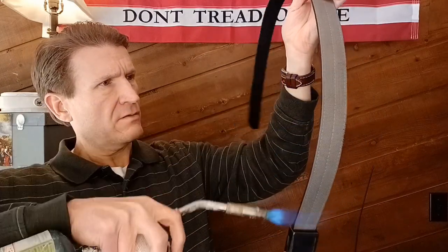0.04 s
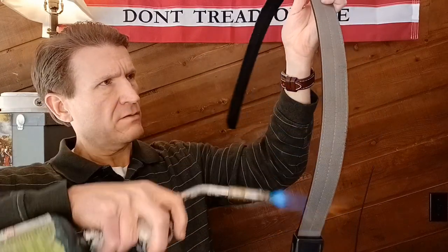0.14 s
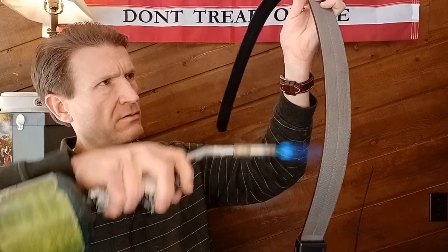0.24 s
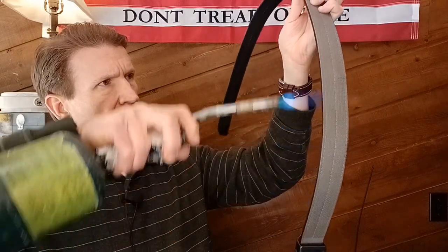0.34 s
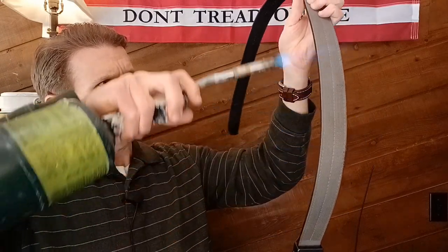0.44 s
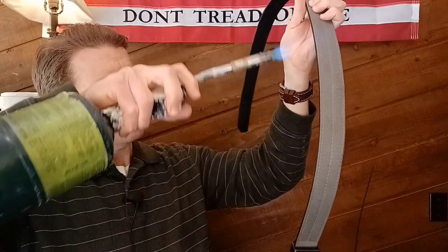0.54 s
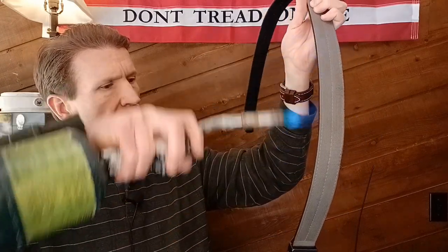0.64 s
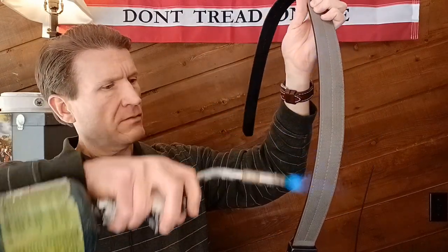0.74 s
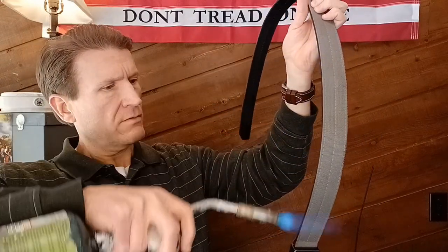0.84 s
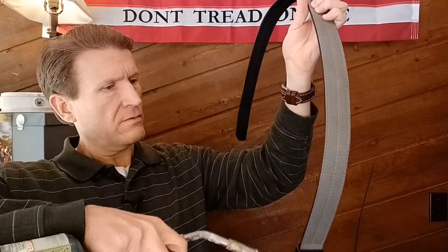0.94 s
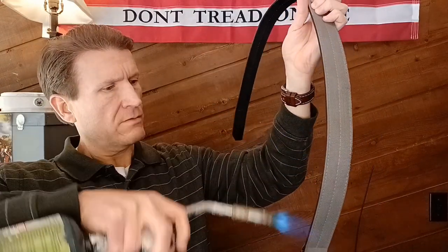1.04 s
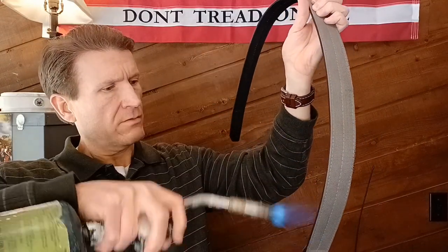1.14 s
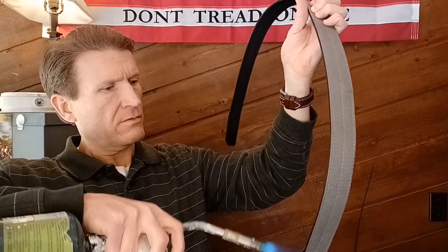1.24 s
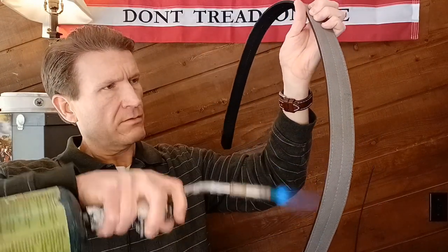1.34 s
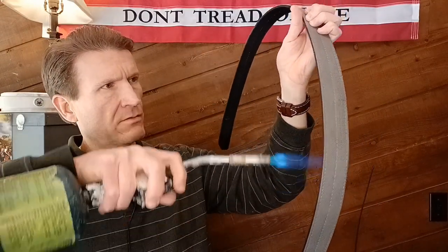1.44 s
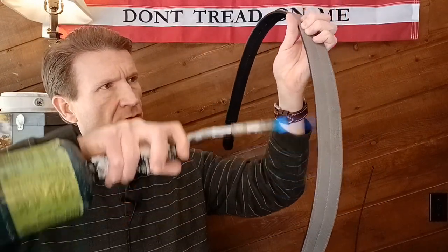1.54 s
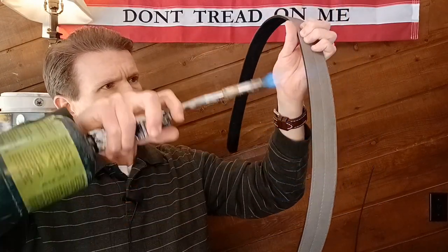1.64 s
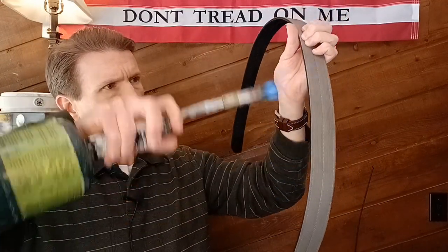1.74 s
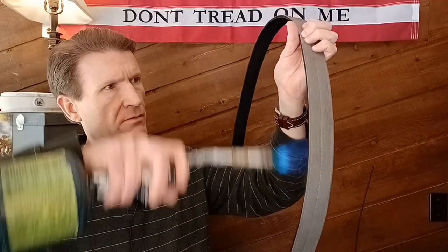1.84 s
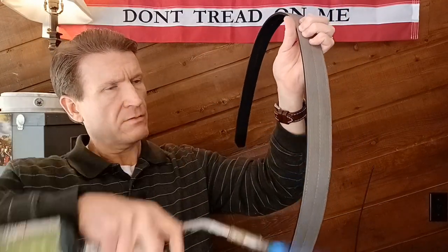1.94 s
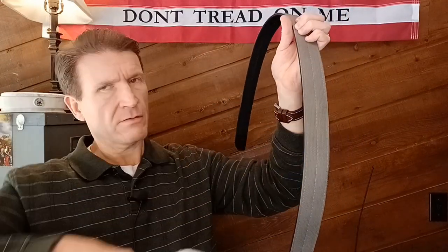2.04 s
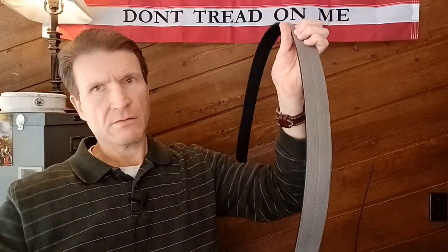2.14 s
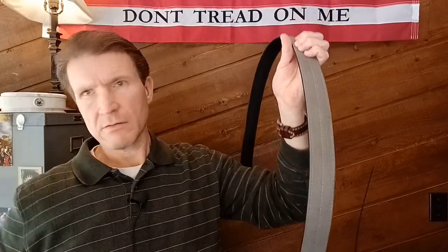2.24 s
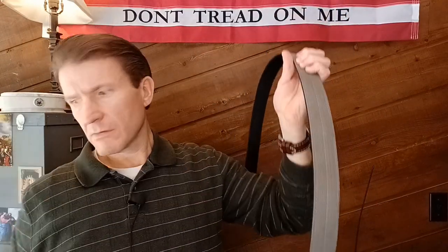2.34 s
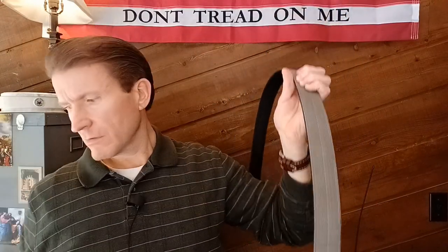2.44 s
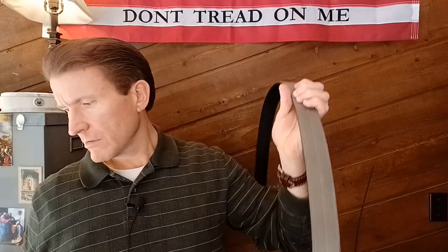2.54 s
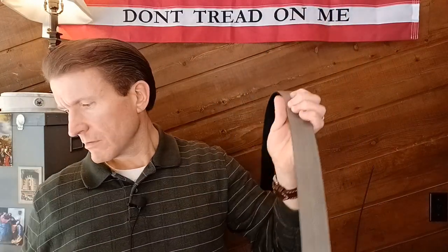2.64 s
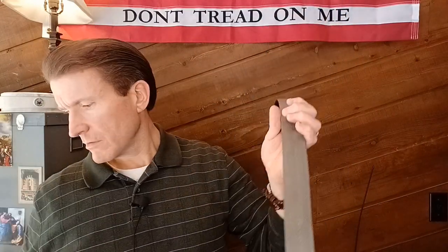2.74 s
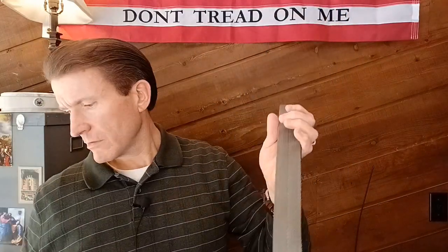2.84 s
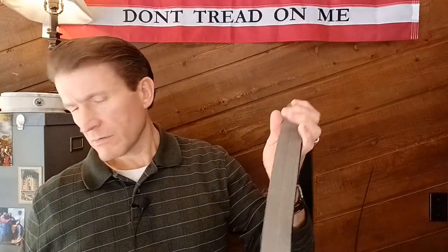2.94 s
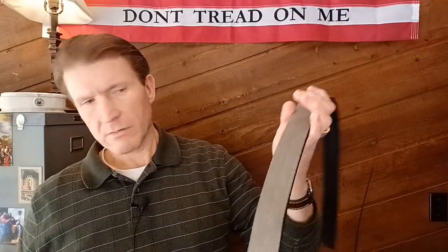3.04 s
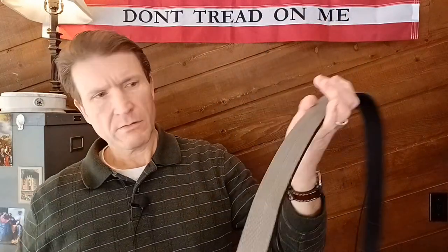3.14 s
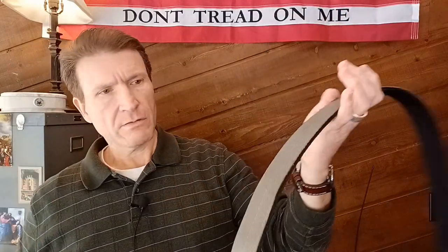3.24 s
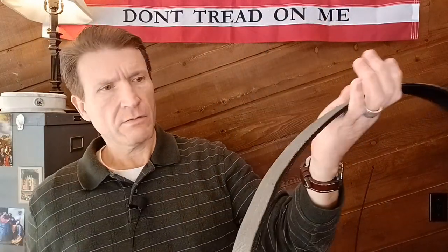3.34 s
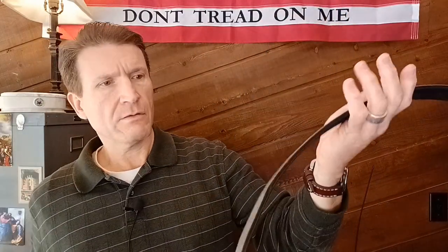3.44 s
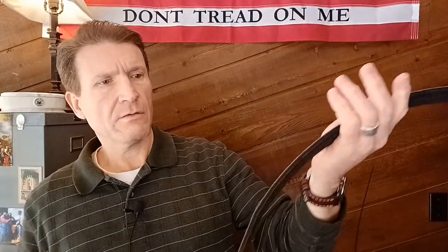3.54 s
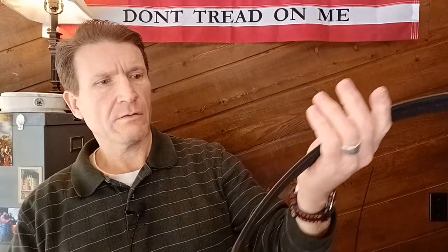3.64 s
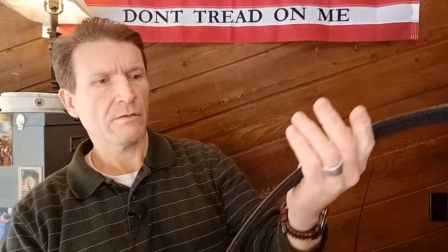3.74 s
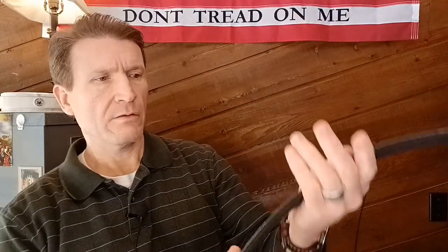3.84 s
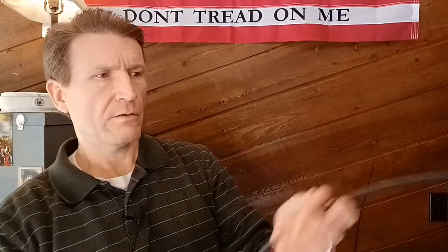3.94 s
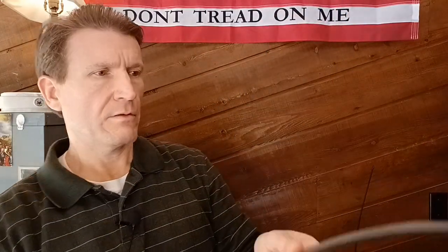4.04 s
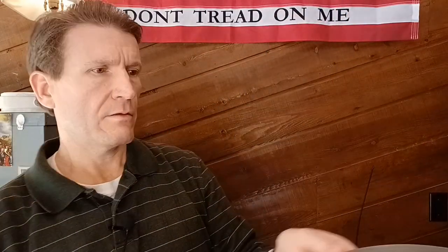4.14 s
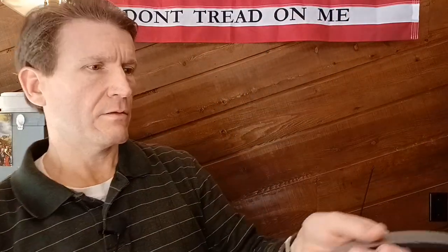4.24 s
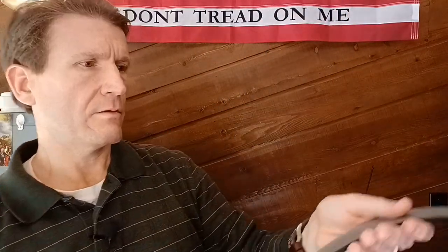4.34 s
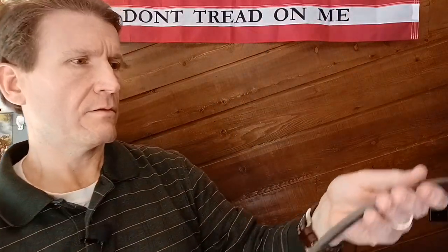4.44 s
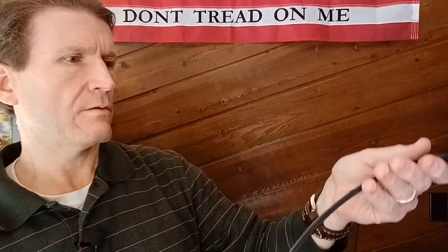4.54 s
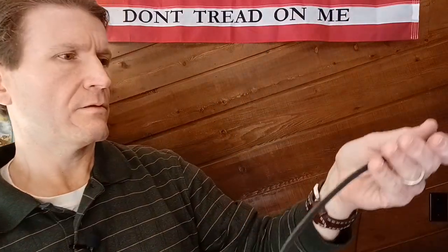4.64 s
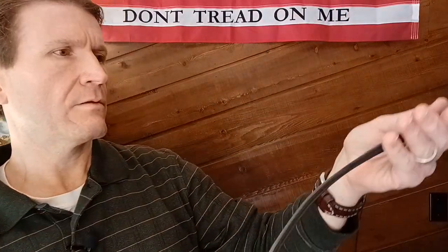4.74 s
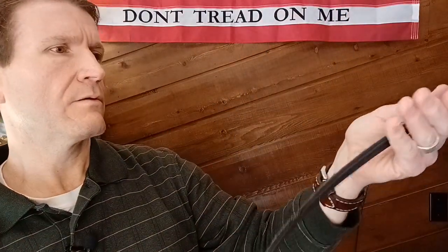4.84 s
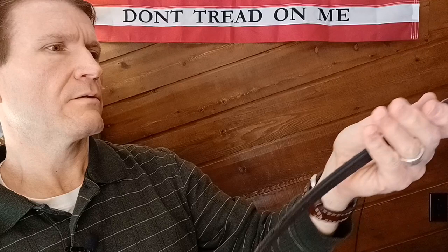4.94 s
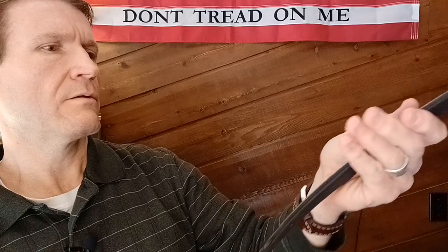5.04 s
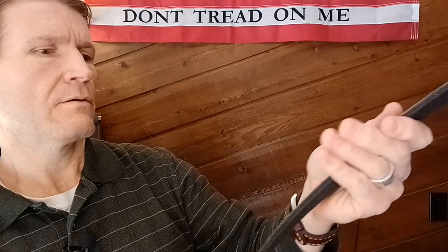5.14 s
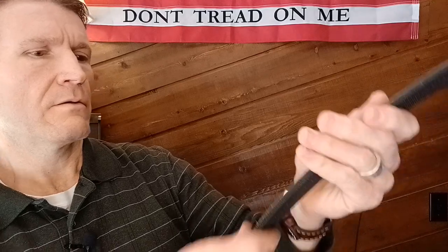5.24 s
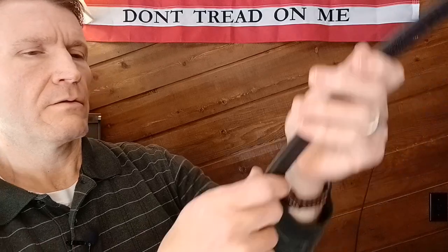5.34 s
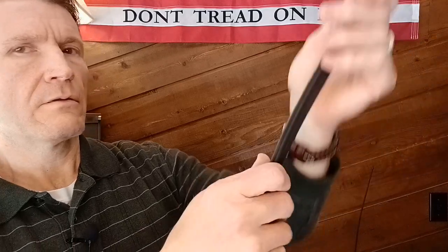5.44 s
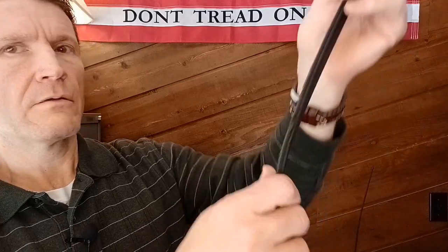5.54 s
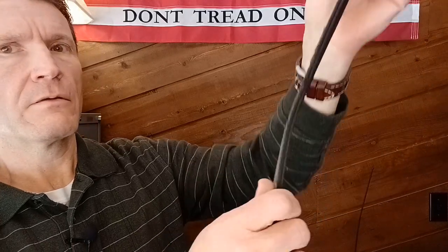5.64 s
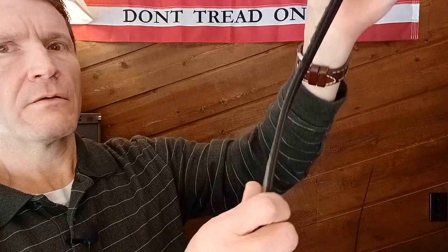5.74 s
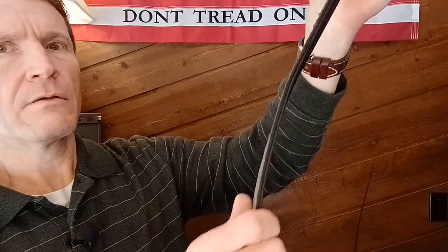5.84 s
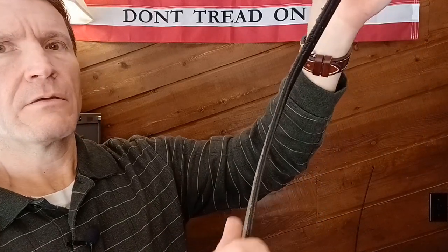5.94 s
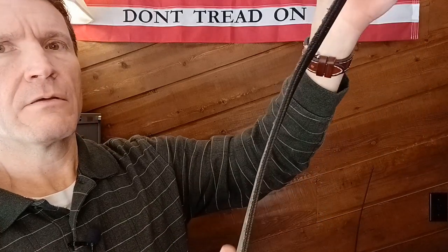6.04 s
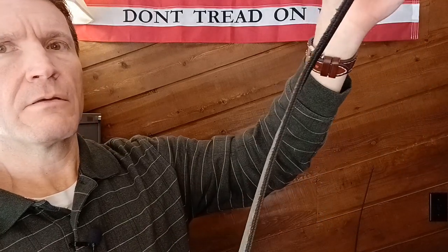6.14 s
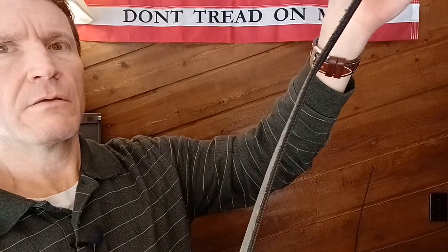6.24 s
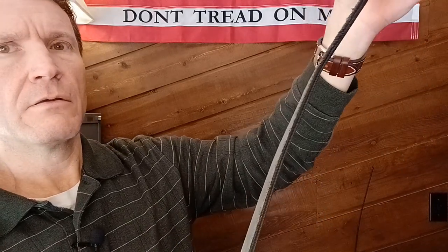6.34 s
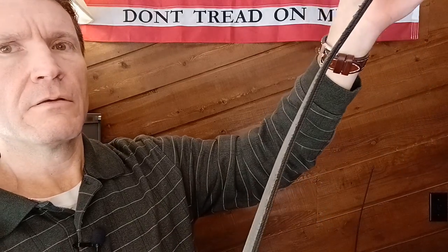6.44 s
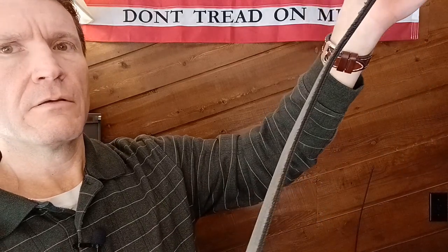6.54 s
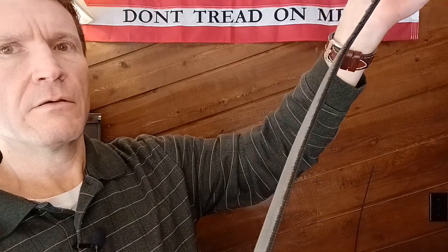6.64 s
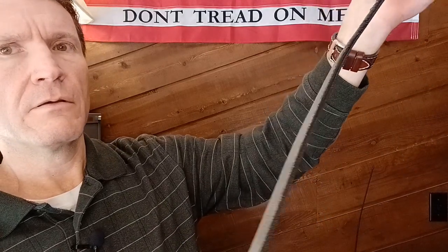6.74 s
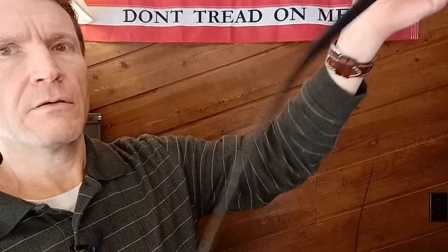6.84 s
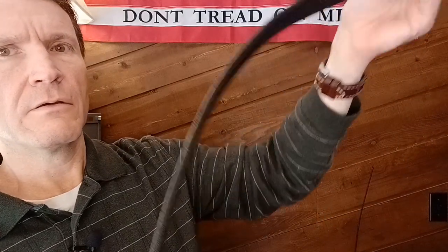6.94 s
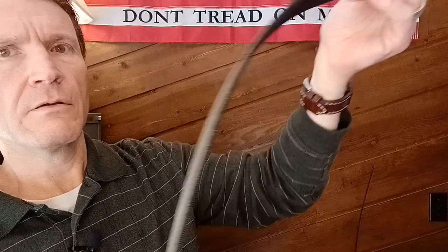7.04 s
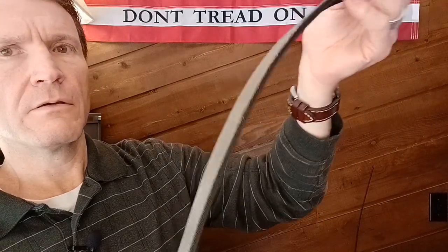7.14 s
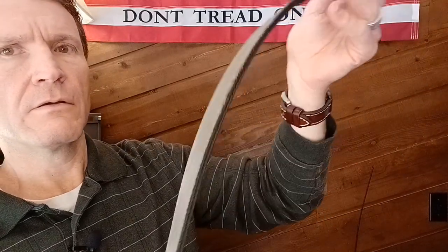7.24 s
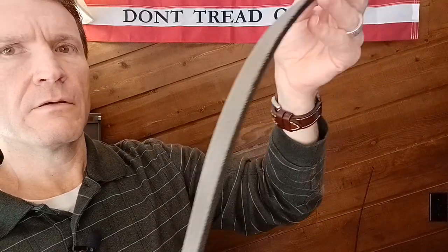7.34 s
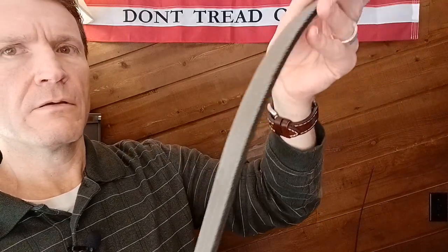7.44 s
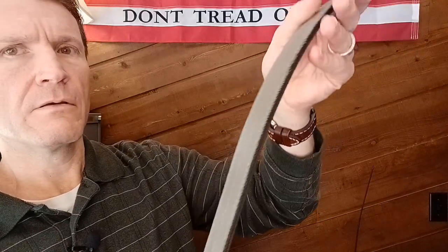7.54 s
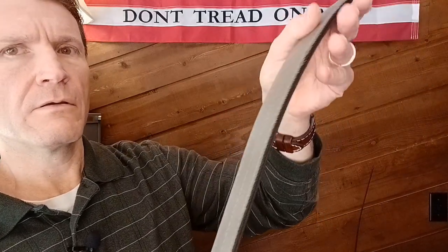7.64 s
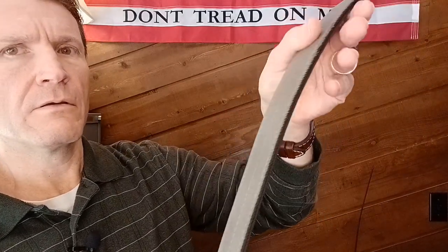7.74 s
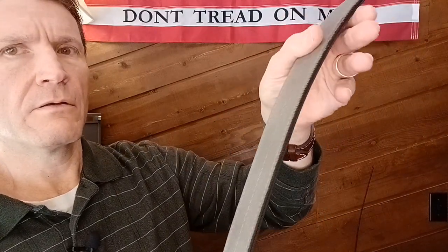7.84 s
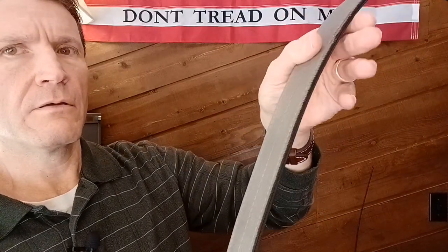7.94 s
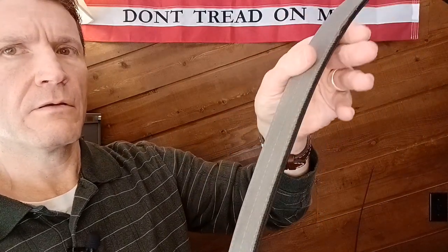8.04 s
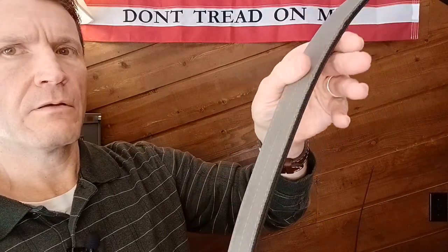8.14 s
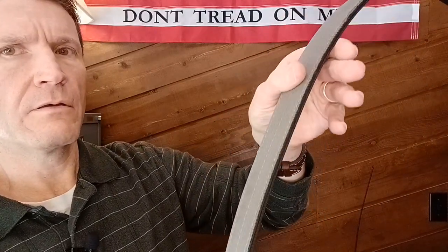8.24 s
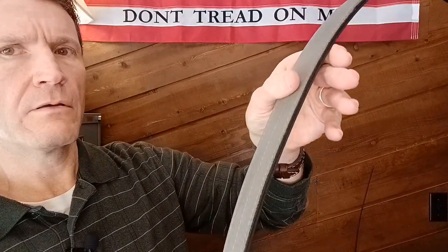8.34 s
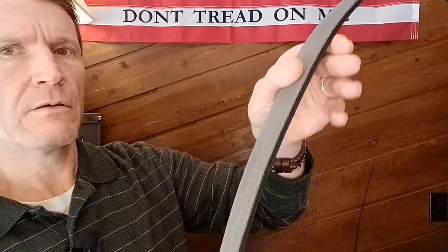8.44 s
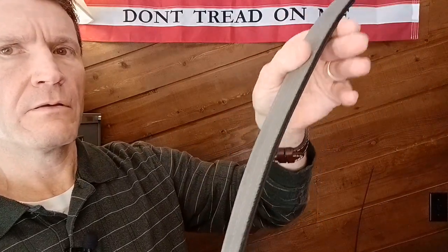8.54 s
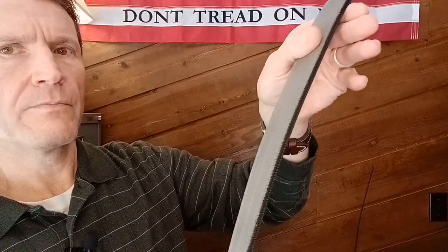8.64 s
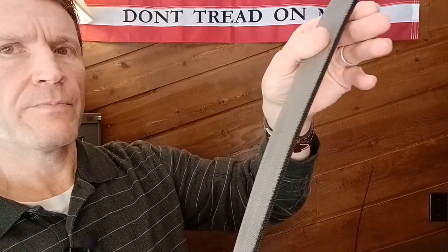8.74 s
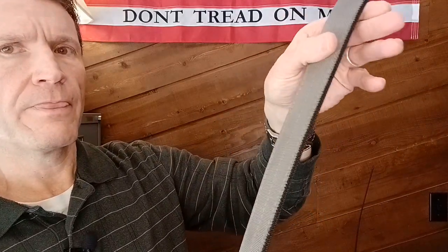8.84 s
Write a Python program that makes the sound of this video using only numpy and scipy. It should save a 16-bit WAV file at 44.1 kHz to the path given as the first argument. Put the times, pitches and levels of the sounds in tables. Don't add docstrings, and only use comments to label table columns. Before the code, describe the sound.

A handheld gas torch roars and hisses for two seconds, shuts off, thuds onto wood, then a woven strap rasps repeatedly through a hand.

```python
import sys
import numpy as np
from scipy import signal
from scipy.fft import rfft, irfft
from scipy.io import wavfile
from scipy.ndimage import uniform_filter1d, map_coordinates

SR = 44100
rng = np.random.default_rng(int(sys.argv[2]) if len(sys.argv) > 2 else 0)


def makeup_ratio(level_db):
    decades = np.asarray(level_db, float) / 20
    return 10 ** decades


def inscribe(sig):
    pcm = np.round(np.clip(np.atleast_2d(sig).T, -1, 1) * 32767)
    wavfile.write(sys.argv[1], SR, pcm.astype(np.int16))


N = 391600

# frequency in Hz, density in dB per Hz.
FIRE_SPECTRUM = [(24, -77.5), (40, -55), (114, -11.5), (154, -16.5), (254, -9.5), (600, -7.5), (1170, -8),
                 (2000, -13.5), (2300, -17.5), (2530, -23.5), (2830, -20.5), (3370, -30), (3760, -36),
                 (4300, -30.5), (5400, -30.5), (5780, -36), (6150, -31), (9770, -32.5), (15700, -43.5)]
# time in seconds, pitch in Hz, boost in dB.
TUBE_NOTE = [(.05, 620, 10.5), (.17, 595, 12), (.25, 560, 16), (.33, 584, 12), (.44, 660, 12),
             (.51, 560, 14.5), (.6, 595, 12), (.66, 694, 12), (.75, 640, 8), (.83, 600, 8), (.9, 718, 9.5),
             (1.0, 690, 10.5), (1.08, 657, 11.5), (1.13, 550, 14), (1.22, 600, 10.5), (1.32, 596, 8),
             (1.42, 557, 15), (1.5, 590, 11.5), (1.6, 630, 9), (1.65, 535, 11), (1.74, 647, 10.5),
             (1.85, 564, 7.5), (2.0, 580, 9)]
# time in seconds, height 0-1.
TORCH_HEIGHT = [(0, .55), (.16, 0), (.4, .6), (.57, .9), (.75, .6), (1.04, 0), (1.2, .2), (1.35, 0),
                (1.55, .65), (1.76, 1), (1.9, .6), (2.0, .15), (2.2, 0)]
# centre in Hz, width in Hz, level in dB at rest, level in dB at full height.
NOZZLE_MODES = [(1700, 700, -1.5, -25.5), (2200, 350, -7, -4.5), (3350, 490, -2.5, 2),
                (5180, 240, -8, -0.5)]
# delay in ms, strength 0-1.
NEARBY_SURFACES = [(.95, .06), (.52, .08)]
ROAR_DB, MID_DB, HISS_DB = -22, -26, -32.5
RAISED_ROAR_DB, RAISED_MID_DB, RAISED_HISS_DB = -1, -6.5, -1
SHUT_S, HISS_LINGERS_S = 2.0313, 0.026
ROAR_FALL_DB_PER_S, MID_FALL_DB_PER_S, HISS_FALL_DB_PER_S = 670, 890, 900
TUBE_WANDER_HZ = 8.3
JET_HZ, JET_RISE_HZ, JET_DB = 9500, 900, -0.5
SHADOW_HZ, SHADOW_RISE_HZ, SHADOW_DEPTH = 6150, 2900, 0.5
BOUNCE_LOW_MS, BOUNCE_HIGH_MS, BOUNCE_STRENGTH = 0.735, 0.61, 0.2

# frequency in Hz, density in dB per Hz.
FIBRE_SPECTRUM = [(2060, -34), (3500, -9), (4090, -12), (4700, -8), (5100, 0), (7440, 0), (9260, -1),
                  (10200, -1), (15700, -10.5)]
# start in seconds, end in seconds, hiss in dB at start, hiss in dB at end,
# weave rasp in dB over the hiss.
STRAP_PULLS = [(3.364, 3.425, -73.5, -67.5, -15.5), (3.425, 3.47, -67, -75, -16),
               (3.482, 3.514, -68, -54, -21), (3.506, 3.556, -54.5, -66.5, -24),
               (3.57, 3.796, -75, -63.5, -24), (3.827, 4.033, -52, -39.5, -10.5),
               (4.099, 4.13, -61.5, -43.5, 0.5), (4.135, 4.396, -41.5, -43.5, 4.5),
               (4.396, 4.872, -43, -42, -2.5), (5.006, 5.029, -43, -38.5, -4),
               (5.026, 5.206, -37.5, -28, -7.5), (5.19, 5.311, -26, -37, -12.5),
               (5.315, 5.365, -34, -51.5, -27), (5.415, 5.487, -55.5, -41.5, -9),
               (5.49, 5.64, -42.5, -45.5, -7), (5.64, 5.776, -49.5, -53, -5.5),
               (5.758, 6.31, -54.5, -52, -1.5), (6.311, 6.702, -48.5, -50.5, -6.5),
               (6.7, 6.778, -48.5, -55, -7), (6.886, 6.921, -69, -57, -7),
               (6.918, 7.184, -57.5, -52.5, -11.5), (7.277, 7.312, -64.5, -53, -12),
               (7.311, 7.527, -51.5, -62.5, -7.5), (7.543, 8.403, -59, -61.5, -17),
               (8.561, 8.884, -63, -67, -7)]
# time in seconds, change in dB, length in seconds.
ARM_TUGS = [(4.197, 1.5, 0.095), (4.361, -3.5, 0.065), (4.512, 7.5, 0.051), (4.579, -2, 0.085),
            (6.332, -4.5, .1), (6.64, 4.5, 0.12), (7.042, 4.5, .1), (5.77, -5, .06), (7.62, 4, .1),
            (8.039, 2, 0.089), (7.894, -6, 0.17), (8.189, -5, 0.056), (8.259, 1.5, 0.059), (8.689, 2, .12)]
# time in seconds, finger rasp in Hz, band cancelled by the cupped palm in Hz,
# depth 0-1, flat contact in dB.
PALM_SHAPE = [(3.53, 2914, 3700, 0.7, -3.5), (3.82, 2070, 3360, .6, 0.5), (3.95, 2130, 4960, 0.6, 1.5),
              (4.14, 2330, 4730, 0.5, 5.5), (4.55, 2240, 5200, 0.97, -1.5), (4.86, 2650, 5200, 0.53, 3.5),
              (5.0, 2330, 7050, .8, -1), (5.09, 2920, 5900, 0.6, 0.5), (5.18, 2970, 5040, 0, -1.5),
              (5.26, 1700, 4400, 0, -1), (5.45, 1850, 2900, 0.74, 4), (5.66, 1840, 3300, 0.4, 6.5),
              (5.76, 2300, 3400, .2, 6.5), (5.8, 2300, 4200, .2, 6), (5.92, 2230, 4200, 0.5, 5),
              (6.1, 2070, 4330, 0.8, 4.5), (6.35, 1980, 4220, .9, 3.5), (6.52, 1870, 4230, 0.77, 2),
              (6.7, 1820, 4400, 0.2, 1.5), (6.9, 3200, 4730, 0.4, 1.5), (7.1, 1910, 4670, 0.3, 1),
              (7.35, 1870, 4600, 0.64, 1), (7.6, 2100, 4450, 0.67, -4), (8.1, 2580, 4100, .7, -5.5),
              (8.4, 2600, 3900, 0.68, -4), (8.57, 2010, 3000, 0.4, 5), (8.62, 2000, 3200, 0.6, 6.5),
              (8.88, 1990, 3380, 1, 4)]
# time in seconds, fizz centre in Hz, finger rasp width in Hz.
WEAVE_GRIP = [(3.8, 9020, 1150), (4.5, 8800, 1150), (4.8, 9520, 900), (5.02, 10120, 1100),
              (5.22, 8900, 1100), (5.35, 8400, 1000), (5.6, 8500, 1000), (5.9, 9000, 700), (6.6, 9500, 750),
              (7.1, 10200, 1100), (7.35, 9500, 900), (7.6, 9100, 900), (8.0, 9600, 900), (8.3, 10700, 900),
              (8.45, 9500, 900), (8.6, 7500, 800), (8.88, 7500, 800)]
# centre in Hz, width in Hz, depth 0-1, time in seconds,
# length in seconds.
FINGER_NOTCHES = [(3100, 840, .75, 5.93, 0.39), (2900, 420, 0.4, 6.25, 0.33), (3000, 590, 0.4, 7.87, .8),
                  (6300, 700, .5, 4.4, .3), (6900, 800, .5, 4.7, .35)]
# time in seconds, level in dB, centre in Hz, length in seconds.
STRAP_SLAPS = [(3.884, -47.5, 5833, 0.039), (4.025, -43, 7236, 0.04), (3.93, -47, 7500, 0.02),
               (5.22, -36, 4800, 0.044), (5.265, -41.5, 1690, 0.083), (5.21, -33, 8700, .06),
               (5.15, -42, 3100, .09), (8.29, -68, 7600, .07), (7.33, -62, 2200, .1),
               (7.07, -64, 3400, .15), (5.725, -57, 470, .07), (2.7, -81, 2300, .3),
               (8.24, -66, 10800, .04), (8.575, -67, 4700, .04), (6.7, -63, 4700, .15),
               (3.52, -73, 2900, 0.055), (4.33, -57.5, 820, 0.26), (5.5, -62, 800, .15),
               (4.0, -61, 1200, 0.11)]
GRIP_DB_PER_S, LET_GO_DB_PER_S = 1500, 600
SKIN_DB, FLAP_DB, FLAP_FOLLOWS = -8, -12.5, 0.68

# time in seconds, peak in dB, thud in dB, snap in dB.
VALVE_EVENTS = [
    (2.332, -45.5, -22, -5),
    (2.4374, -40.5, 8, -13),
    (2.4507, -42, -8, -15),
    (2.462, -50, -17, -24),
]
# frequency in Hz, level in dB, T60 in seconds.
TRIGGER_MODES = [(975, -1, 0.05), (1500, -6, .012), (2200, -4, .015), (4600, -8, .01)]
# frequency in Hz, level in dB, T60 in seconds.
LATCH_MODES = [(200, -3, .15), (470, -8, .12), (640, -7, .1), (810, -10, .06), (1268, -6, .08),
               (2606, -3, .028), (3540, -7, .022)]
# frequency in Hz, level in dB, T60 in seconds.
BRASS_MODES = [(619, -10, .12), (985, -14, .1), (1275, -3, .12), (1348, 4, .19), (2050, -18, .05),
               (2500, -15, .045), (3480, -20, .045), (3680, -19, .045)]
# time in seconds, level in dB, T60 in seconds.
CYLINDER_CONTACTS = [
    (2.8825, -38, 0.03),
    (2.886, -29, 0.1),
    (2.896, -30, .1),
    (2.905, -30, 0.1),
    (2.923, -33, 0.064),
    (2.94, -40, 0.23),
    (3.044, -58, .06),
    (3.109, -62, .1),
    (3.171, -72, .1),
]
# frequency in Hz, density in dB per Hz.
TABLE_SPECTRUM = [(24, -60), (90, -22), (140, -9), (250, -4), (409, -3), (780, -10), (1070, -8),
                  (1450, -20), (2500, -25), (3510, -28), (5500, -36), (9520, -35), (11300, -38),
                  (12200, -62), (15700, -75)]
# frequency in Hz, level in dB, T60 in seconds.
CYLINDER_MODES = [(115, -28, .16), (199, -29, .12), (254, -29, .12), (330, -30, .14), (422, -30, .2),
                  (899, -44, .1), (1028, -41, .08), (1090, -31, .08), (640, -33, .08), (1367, -54, .7),
                  (3397, -62, .2)]
# time in seconds, level in dB, frequency in Hz, T60 in seconds.
BASE_THUD = (2.937, -22, 135, .05)

# time in
# seconds, peak in dB, centre in Hz, broad crack relative to the tone.
JOINT_TICKS = [(2.062, -36, 10070, 1), (2.281, -56, 9900, 0.86), (2.3135, -48, 7315, .4),
               (2.3135, -54, 4200, .2), (2.319, -60, 4500, .5), (2.505, -56, 10500, .3),
               (2.622, -68, 7850, 0.27), (2.6738, -51, 10000, 0.29), (2.883, -33, 5770, 0.33),
               (2.887, -38, 6700, .8), (2.8822, -42, 9600, .2), (2.492, -61, 10300, .2),
               (3.066, -62, 7500, .4), (2.927, -49.5, 9500, .2), (3.0394, -53, 7500, .5),
               (3.3598, -49, 9300, .8), (3.3598, -57, 4200, .2), (3.422, -61.5, 10500, .5),
               (3.561, -57.5, 10000, .5), (3.677, -56, 12500, 0.33), (3.922, -43, 7980, 1),
               (4.228, -32, 8480, 0.55), (4.302, -26, 2500, .5), (4.493, -30, 8020, .5),
               (4.501, -32, 2740, .3), (4.537, -30, 2690, .3), (5.0964, -27, 2600, .3),
               (5.193, -28, 2200, .3), (5.222, -25.5, 8500, 1), (8.5294, -43, 7400, .7),
               (8.5292, -57, 2400, .2)]
# time in seconds, level in dB.
RING_CHINKS = [
    (5.706, -44),
    (5.726, -42.5),
]
# frequency in Hz, level in dB, T60 in seconds.
RING_MODES = [(470, -8, 0.04), (4730, -17, .1), (5720, -5, 0.24), (7294, -6, 0.11), (8550, -6, .04),
              (11900, 1, 0.19), (12340, -16, .12), (13300, -14, .1)]
# time in seconds, length in seconds, first pitch in Hz, last pitch in Hz, level in dB,
# arch in Hz.
THIN_SQUEAKS = [
    (2.69, .1, 11300, 10700, -82, 0),
    (2.6, .14, 2100, 2100, -85, 0),
    (2.72, .08, 2120, 2170, -80, 0),
    (4.915, .04, 10300, 10900, -78, 200),
    (4.94, .07, 11500, 11200, -79, 200),
    (4.91, .1, 7700, 7700, -80, 600),
]

# frequency in Hz, density in dB per Hz.
AIR_SPECTRUM = [(18, -51.5), (30, -28.5), (114, -3.5), (309, 2.5), (445, -1.5), (521, -11.5), (814, -2),
                (1650, -34.5), (2140, -27), (3180, -25.5), (9540, -14.5), (11300, -19), (12000, -25),
                (13100, -27), (15700, -23.5)]
# centre in Hz, width in Hz, level in dB.
HUM_BANDS = [(119, 14, -78), (224, 57, -66), (313, 87, -69.5), (444, 57, -73.5), (15698, 6, -83)]
# time in seconds, level in dB, rise in seconds, T60 in seconds.
BOARD_STEPS = [
    (3.02, -55, .12, 0.94),
    (3.61, -64.5, 0.32, 2),
]
# frequency in Hz, T60 in seconds.
ROOM_T60 = [(100, 0.34), (500, 0.29), (2000, 0.31), (8000, 0.2), (11200, .19), (12200, .13), (15000, 0.12)]
AIR_DB, RUMBLE_DB = -67, -79.5
CLOTH_FINE_DB, CLOTH_COARSE_DB = -82, -69
REACH_S, REACH_DB, REACH_END_S = 2.97, 3, 2.97


def flame():
    def gain(hz, t):
        height, = curves(TORCH_HEIGHT, t)
        shut_s = np.clip(t - SHUT_S, 0, None)
        roar_db = ROAR_DB + RAISED_ROAR_DB * height - ROAR_FALL_DB_PER_S * shut_s
        mid_db = MID_DB + RAISED_MID_DB * height ** 2 + 1.3 * slow(8, t) - MID_FALL_DB_PER_S * shut_s
        hiss_db = HISS_DB + RAISED_HISS_DB * (height - 0.4) + 0.91 * slow(6.3, t)
        hiss_db = hiss_db - 150 * shut_s - HISS_FALL_DB_PER_S * np.clip(shut_s - HISS_LINGERS_S, 0, None)

        jet = sum(makeup_ratio(low_db + (high_db - low_db) * height) * bump(hz, centre_hz, width_hz) ** 2
                  for centre_hz, width_hz, low_db, high_db in NOZZLE_MODES)
        whistle_hz = JET_HZ + JET_RISE_HZ * height + 250 * slow(9, t)
        jet = jet + makeup_ratio(JET_DB) * bump(hz, whistle_hz, width_hz=2200) ** 2
        depth = np.clip(SHADOW_DEPTH * (1 - 0.3 * height + 0.35 * slow(9, t)), 0, 1)
        shadow_hz = SHADOW_HZ + SHADOW_RISE_HZ * height + 150 * slow(11, t)
        shadow = 1 - depth * bump(hz, shadow_hz, width_hz=750) ** 2
        base = makeup_ratio(along(FIRE_SPECTRUM, hz)) * (1 + jet) * shadow

        low = 1 / (1 + (hz / 1100) ** 6)
        high = 1 / (1 + (3000 / (hz + 1)) ** 6)
        tube_hz, boost_db = curves(TUBE_NOTE, t)
        tube_hz = tube_hz + TUBE_WANDER_HZ * slow(7.9, t)
        roar = steady(base * low) * (1 + makeup_ratio(boost_db - 0.5) * bump(hz, tube_hz, width_hz=62) ** 2)
        mid = steady(base * np.abs(1 - low - high))
        hiss = steady(base * high)
        power = (makeup_ratio(roar_db) * roar) ** 2 + (makeup_ratio(mid_db) * mid) ** 2 + (makeup_ratio(hiss_db) * hiss) ** 2

        delay_ms = BOUNCE_LOW_MS + (BOUNCE_HIGH_MS - BOUNCE_LOW_MS) * height
        strength = BOUNCE_STRENGTH * bump(hz, 7800, width_hz=5000) ** 2
        late = echo(hz, delay_ms, strength) + echo(hz, 0.5 * delay_ms, 0.32 * strength)
        late = late + sum(echo(hz, *row) for row in NEARBY_SURFACES)
        return np.sqrt(power) * np.abs(1 + late) * (t < 2.2)

    flutter = makeup_ratio(0.3 * wobble(12) + 0.4 * wobble(30) + 0.9 * wobble(200))
    return shaped(unit(flutter * rng.standard_normal(N)), gain, patchy_db=1.2, size=256)


def strap():
    def gain(hz, t):
        hiss_db, rasp_db = pulling(t)
        swing_db = 20 * np.log10(uniform_filter1d(makeup_ratio(hiss_db), size=45))
        rasp_hz, palm_hz, depth, contact_db = curves(PALM_SHAPE, t)
        fizz_hz, rasp_width_hz = curves(WEAVE_GRIP, t)
        fizz_hz = fizz_hz + 250 * slow(13, t)
        skin_db = SKIN_DB + contact_db + 2.2 * slow(12, t)
        flap_db = FLAP_DB + FLAP_FOLLOWS * (swing_db + 48.5) - (hiss_db + 51)
        flap_db = flap_db + contact_db + 0.5 * slow(11, t)

        dull = makeup_ratio(-0.15 * (hiss_db + 52) * np.clip(hz / 11000 - 1, 0, 1) * 4.7)
        fizz = (1 + 3.4 * bump(hz, fizz_hz, width_hz=2400)) / (1 + (6200 / (hz + 1)) ** 8)
        hiss = steady(makeup_ratio(along(FIBRE_SPECTRUM, hz)) * dull * fizz)
        rasp = steady(bump(hz, rasp_hz, rasp_width_hz) ** 2)
        skin = steady(bump(hz, 5400, width_hz=8000) ** 2 + 0 * t)
        flap = steady(bump(hz, 360, width_hz=1860) ** 2 * hz / (hz + 120) + 0 * t)
        power = hiss ** 2 + (makeup_ratio(rasp_db) * rasp) ** 2
        power = power + (makeup_ratio(skin_db) * skin) ** 2 + (makeup_ratio(flap_db) * flap) ** 2

        notch = 1 - np.clip(depth, 0, 1) * bump(hz, palm_hz, width_hz=1000) ** 2
        notch = notch - sum(share * bump(hz, gap_hz, width_hz) ** 2 * swell(t, s, length_s)
                            for gap_hz, width_hz, share, s, length_s in FINGER_NOTCHES)
        return makeup_ratio(hiss_db) * np.sqrt(power) * np.abs(notch) * (t > 3.3)

    catches = makeup_ratio(1.4 * wobble(400) + 0.9 * wobble(70) + 0.7 * wobble(18))
    return shaped(unit(catches * rng.standard_normal(N)), gain, patchy_db=1.5, size=128)


def pulling(t):
    start, end, from_db, to_db, rasp_db = np.transpose(STRAP_PULLS)[..., None]
    level_db = from_db + (to_db - from_db) * np.clip((t - start) / (end - start), 0, 1)
    level_db = level_db - GRIP_DB_PER_S * np.clip(start - t, 0, None)
    level_db = level_db - LET_GO_DB_PER_S * np.clip(t - end, 0, None)
    tug_db = sum(db * swell(t, s, length_s) for s, db, length_s in ARM_TUGS)
    return np.maximum(level_db.max(axis=0), -120) + tug_db, rasp_db[level_db.argmax(axis=0), 0]


def slaps():
    def gain(hz, t):
        return sum(makeup_ratio(db) * steady(bump(hz, centre_hz, 0.73 * centre_hz) ** 3) * swell(t, s, length_s)
                   for s, db, centre_hz, length_s in STRAP_SLAPS)
    return shaped(rng.standard_normal(N), gain, patchy_db=3, size=128)


def torch_body():
    out, blows, t = np.zeros(N), np.zeros(N), np.arange(SR // 2) / SR
    struck = (TRIGGER_MODES, LATCH_MODES, BRASS_MODES, BRASS_MODES)
    for (s, db, thud_db, snap_db), modes in zip(VALVE_EVENTS, struck):
        thud = makeup_ratio(thud_db - 60 * t / 0.013) * np.sin(2 * np.pi * 240 * t) * (1 - np.exp(-t / 0.0013))
        snap = makeup_ratio(snap_db - 7 - 60 * t / 0.013) * crack(count=len(t))
        ring = ringing(modes, t, attack_s=0.001, rough=5)
        add(out, s, makeup_ratio(db) * (0.77 * ring + 2.9 * thud + snap))

    for s, db, t60_s in CYLINDER_CONTACTS:
        add(blows, s, makeup_ratio(db - 60 * t / t60_s) * rng.standard_normal(len(t)))
    landing_s = CYLINDER_CONTACTS[0][0]
    add(out, landing_s, ringing(CYLINDER_MODES, t, attack_s=0.004, rough=1.5))
    s, db, hz, t60_s = BASE_THUD
    add(out, s, ringing([(hz, db, t60_s)], t, attack_s=0.003, rough=0))
    wood = shaped(blows, lambda hz, t: steady(makeup_ratio(along(TABLE_SPECTRUM, hz)) + 0 * t), patchy_db=3, size=128)
    landed = np.clip((np.arange(N) / SR - landing_s + 0.001) / 0.003, 0, 1)
    return out + wood * landed


def small_metal():
    out, t = np.zeros(N), np.arange(SR // 4) / SR
    for s, db, hz, broad in JOINT_TICKS:
        snap = broad * crack(count=len(t)) + np.sin(2 * np.pi * hz * t)
        add(out, s, makeup_ratio(db - 1 - 60 * t / 0.004) * snap)
    for s, db in RING_CHINKS:
        add(out, s, makeup_ratio(db) * ringing(RING_MODES, t, attack_s=0.00038, rough=2.6))
    for s, length_s, from_hz, to_hz, db, arch_hz in THIN_SQUEAKS:
        u = np.clip(t / length_s, 0, 1)
        pitch_hz = from_hz + (to_hz - from_hz) * u ** 2 + arch_hz * np.sin(np.pi * u)
        add(out, s, makeup_ratio(db) * np.sin(np.pi * u) * np.sin(2 * np.pi * np.cumsum(pitch_hz) / SR))
    return out


def background():
    hz, t = np.fft.rfftfreq(N, 1 / SR), np.arange(N) / SR

    def noise(gain):
        return unit(irfft(rfft(rng.standard_normal(N)) * gain, N))

    hums = sum(makeup_ratio(db) * noise(bump(hz, centre_hz, width_hz) ** 2) for centre_hz, width_hz, db in HUM_BANDS)
    boards = sum(makeup_ratio(db - 60 * np.clip(t - s, 0, None) / t60_s) * np.clip(1 + (t - s) / rise_s, 0, 1)
                 for s, db, rise_s, t60_s in BOARD_STEPS)
    rumble = (makeup_ratio(RUMBLE_DB) + boards) * makeup_ratio(1.6 * wobble(9.7)) * noise(bump(hz, 120, width_hz=83) ** 2)

    reach_db = REACH_DB * swell(t, REACH_S, length_s=0.204)
    coarse_db = CLOTH_COARSE_DB + reach_db - 50 * np.clip(t - REACH_END_S, 0, None)
    fine = noise(bump(hz, 9900, width_hz=4500) ** 3 / (1 + (hz / 11600) ** 40))
    coarse = noise(bump(hz, 520, width_hz=700) ** 2)
    cloth = makeup_ratio(CLOTH_FINE_DB + reach_db) * fine + makeup_ratio(coarse_db) * coarse
    cloth = cloth * makeup_ratio(2.2 * wobble(120)) * (t < 3.81)

    air = makeup_ratio(AIR_DB + 0.33 * wobble(1.2)) * noise(makeup_ratio(along(AIR_SPECTRUM, hz)) * (hz > 150))
    return air + rumble + cloth + hums


def room(x):
    hz, t, z = signal.stft(rng.standard_normal(SR // 2), SR, nperseg=256)
    decay = makeup_ratio(-60 * t / along(ROOM_T60, hz)[:, None])
    tail = signal.istft(z * decay, SR, nperseg=256)[1]
    return signal.fftconvolve(np.pad(x, (350, 0)), tail / np.linalg.norm(tail))[:N]


def unit(x):
    return x / np.sqrt(np.mean(x ** 2) + 1e-20)


def along(points, hz):
    f, v = np.transpose(points)
    return np.interp(np.log(hz + 1), np.log(f + 1), v)


def curves(rows, t):
    s, *cols = np.transpose(rows)
    return [np.interp(t, s, c) for c in cols]


def wobble(rate_hz):
    knots = rng.standard_normal(int(N * rate_hz / SR) + 4)
    return map_coordinates(knots, [np.arange(N) * rate_hz / SR])


def slow(rate_hz, t):
    return np.interp(t * SR, np.arange(N), wobble(rate_hz))


def swell(t, s, length_s):
    return np.exp(-4 * ((t - s) / length_s) ** 2)


def bump(hz, centre_hz, width_hz):
    return hz * width_hz / np.sqrt((centre_hz ** 2 - hz ** 2) ** 2 + (hz * width_hz) ** 2 + 1)


def echo(hz, delay_ms, strength):
    return strength * np.exp(-2j * np.pi * hz * delay_ms / 1000)


def steady(gain):
    return gain / np.sqrt(np.mean(gain ** 2, axis=0) + 1e-20)


def shaped(x, gain, patchy_db, size):
    hz, t, z = signal.stft(x, SR, nperseg=4 * size, noverlap=3 * size)
    field = uniform_filter1d(rng.standard_normal(z.shape), size=768 // size, axis=0)
    field = uniform_filter1d(field, size=2560 // size, axis=1)
    z = z * gain(hz[:, None], t) * makeup_ratio(patchy_db * unit(field))
    return signal.istft(z, SR, nperseg=4 * size, noverlap=3 * size)[1][:N]


def ringing(modes, t, attack_s, rough):
    def drift():
        return rough * np.cumsum(rng.standard_normal(len(t))) / np.sqrt(SR)
    tones = sum(makeup_ratio(db - 60 * t / t60_s) * np.sin(2 * np.pi * hz * t + drift()) for hz, db, t60_s in modes)
    return tones * (1 - np.exp(-t / attack_s))


def crack(count):
    band = signal.butter(4, [2000, 11500], "bandpass", fs=SR, output="sos")
    return unit(signal.sosfilt(band, rng.standard_normal(count)))


def add(track, s, sound):
    part = track[round(s * SR):][:len(sound)]
    part += sound[:len(part)]


def scene():
    fire, rub, body, metal = flame(), strap() + slaps(), torch_body(), small_metal()
    wet = makeup_ratio(-8) * fire + makeup_ratio(-12.5) * rub + makeup_ratio(-8) * body + makeup_ratio(-9) * metal
    return (fire + rub + body + metal + room(wet) + background())[None]


def low_pass(x):
    return signal.sosfilt(signal.butter(12, 15760, fs=SR, output="sos"), x)


def record(dry):
    thin = signal.sosfilt(signal.butter(2, 60, "highpass", fs=SR, output="sos"), dry)
    thin = irfft(rfft(thin) * (np.fft.rfftfreq(N, 1 / SR) < 15770), N)
    return low_pass(thin)


dry = scene()
out = record(dry)
inscribe(out)
```